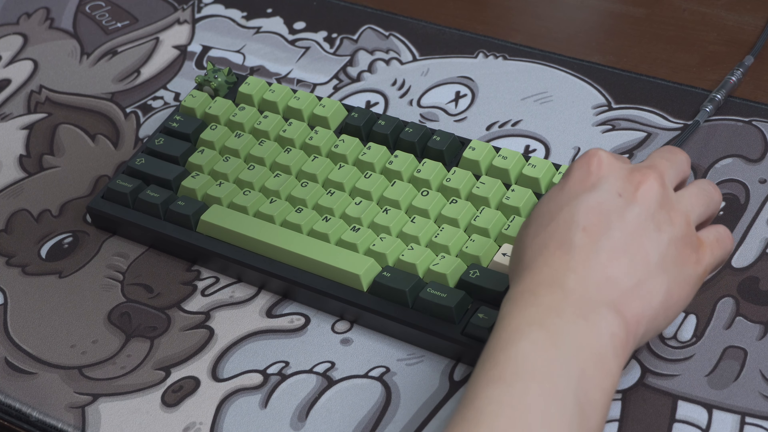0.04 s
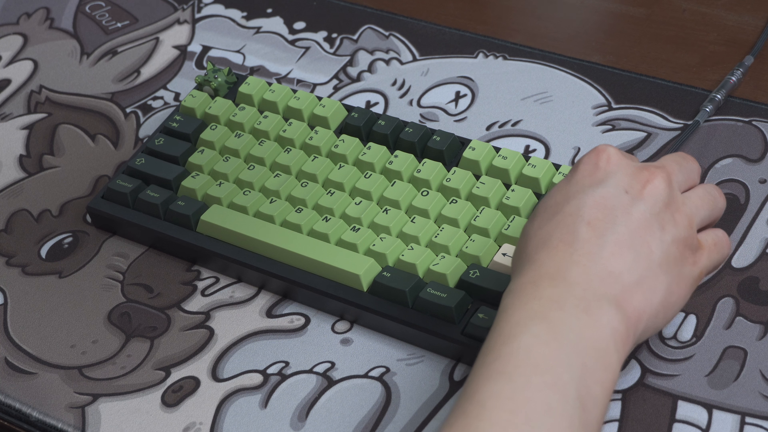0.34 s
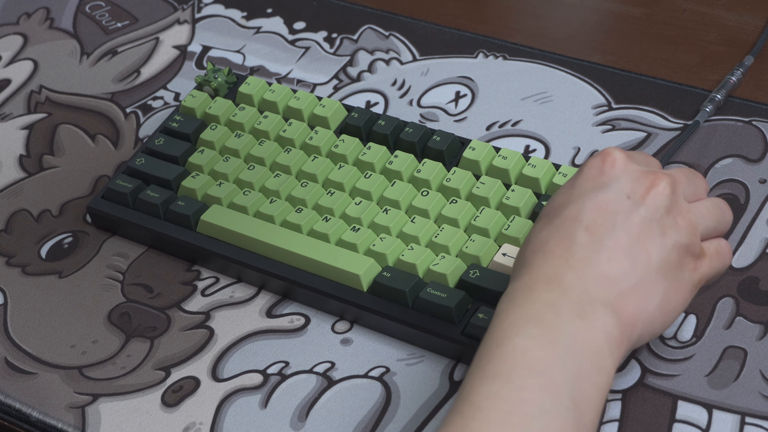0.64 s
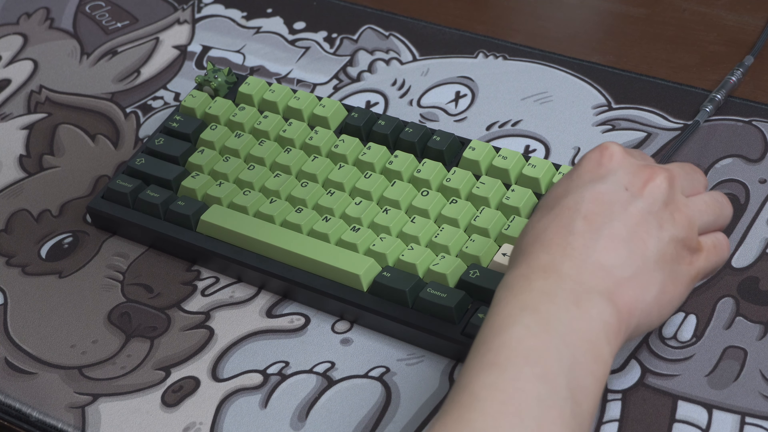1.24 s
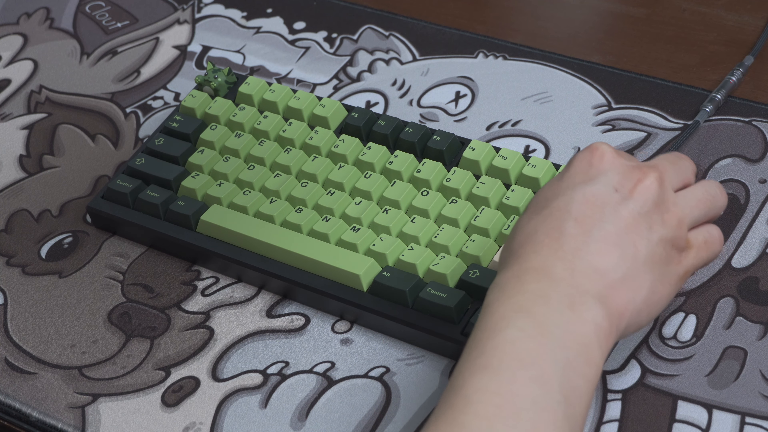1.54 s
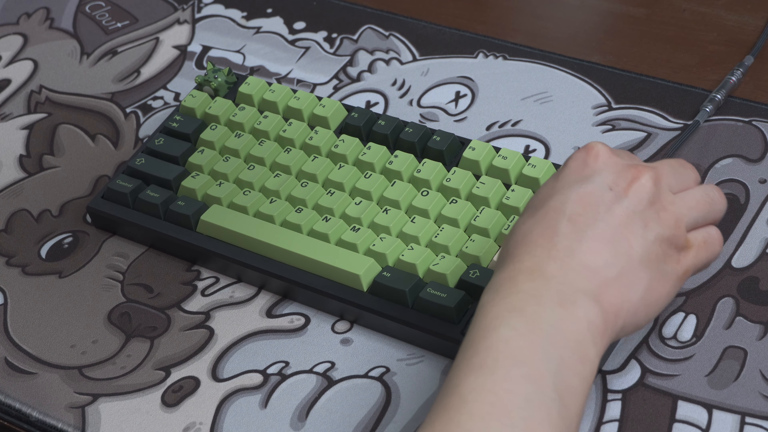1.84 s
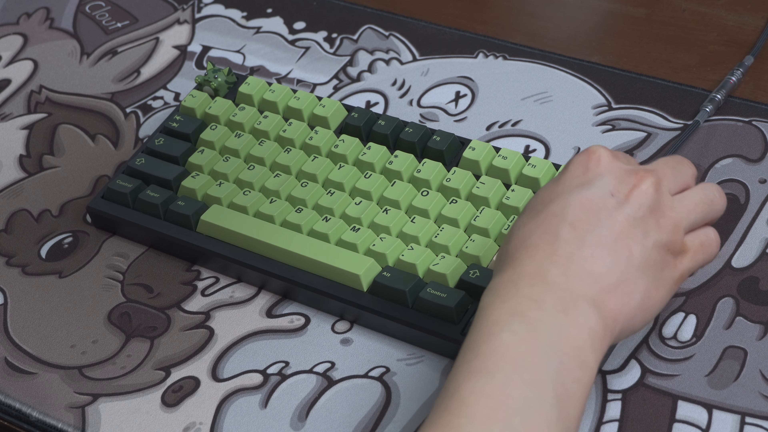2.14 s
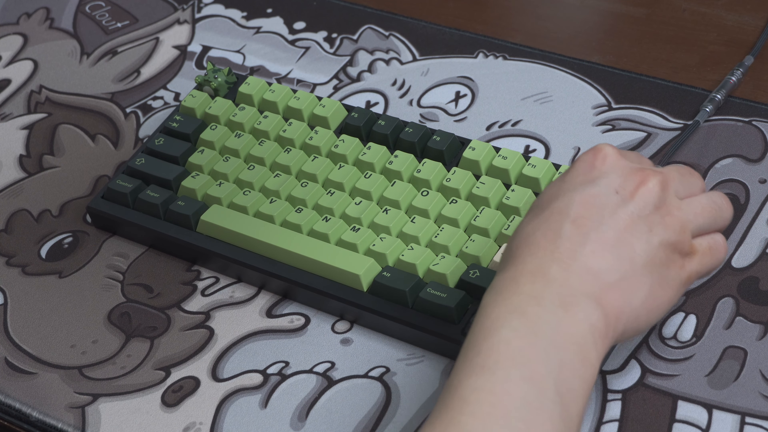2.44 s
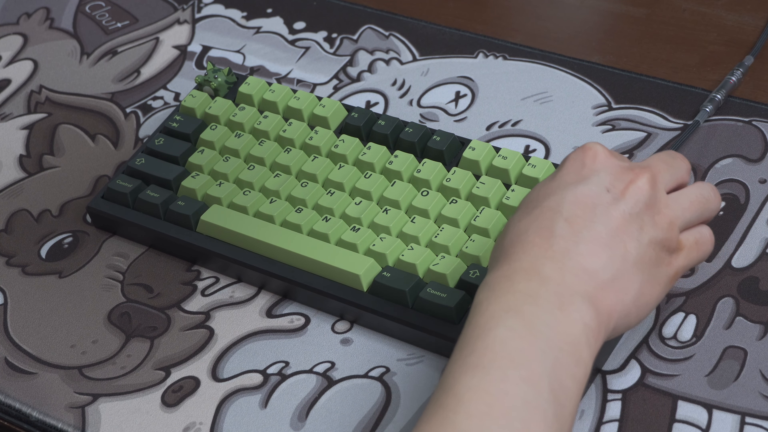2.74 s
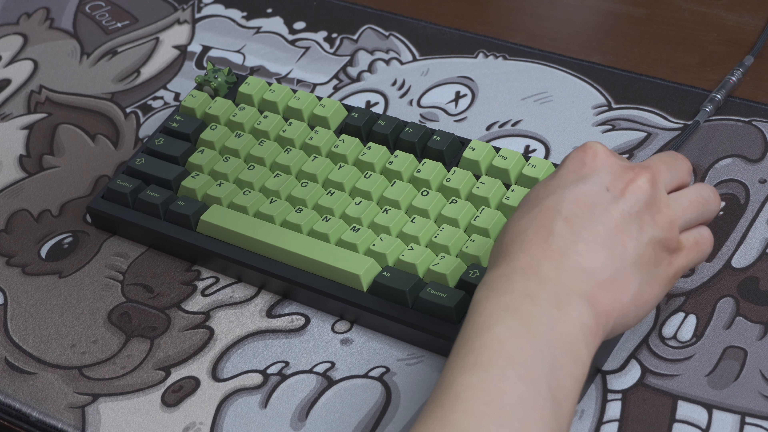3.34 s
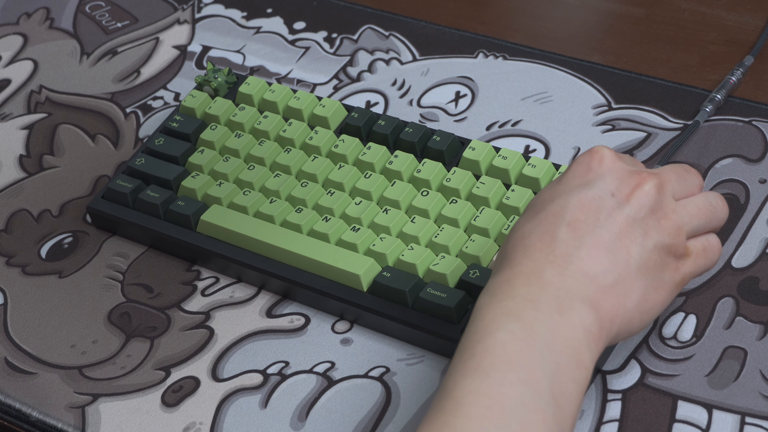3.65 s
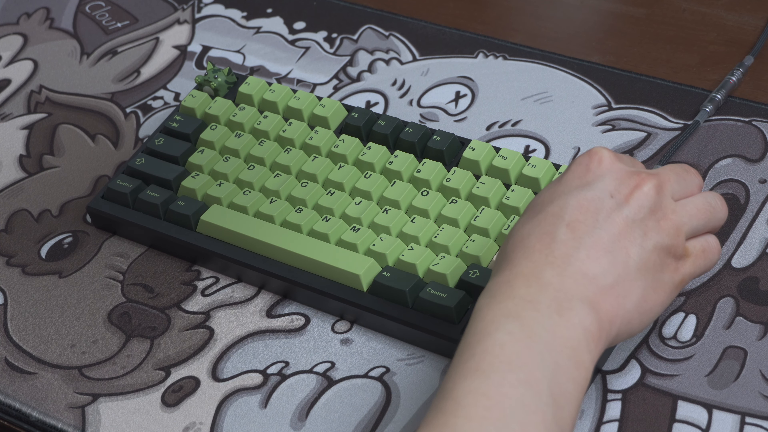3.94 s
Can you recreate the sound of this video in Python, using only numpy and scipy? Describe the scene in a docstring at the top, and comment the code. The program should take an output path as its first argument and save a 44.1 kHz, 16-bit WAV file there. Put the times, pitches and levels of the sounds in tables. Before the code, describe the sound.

A keyboard's rotary knob clicks through its notches, close by. A slow, soft run starts at about 0.3 seconds, then roughly ten quicker twists follow, each a short ratchet-like burst of small, slightly ringing clicks, ending near 3.4 seconds. Fingers faintly rub the case between 1 and 2 seconds, with a few soft, low bumps on the desk mat. Quiet room hum continues underneath and swells slightly at the end.

```python
"""Detented knob on a mechanical keyboard, twisted back and forth in eleven quick strokes.
Per detent: the spring ticks, the knob rings with a short falling chirp and seats, the case thuds.
A nearby surface reflects each click; a short echo follows. The hand bumps the desk mat and
rubs the case. Background: quiet room noise, hum, subsonic drift, faint whines."""
import sys
import numpy as np
from scipy import signal
from scipy.fft import rfft, irfft, next_fast_len
from scipy.io import wavfile

SR = 44100
rng = np.random.default_rng(int(sys.argv[2]) if len(sys.argv) > 2 else 0)


def int16_out(signal):
    """Quantize to a 16-bit WAV file."""
    q = np.round(np.clip(np.atleast_2d(signal).T, -1, 1) * 32767)
    wavfile.write(sys.argv[1], SR, q.astype(np.int16))


N = 176400
TIME_S = np.arange(N) / SR
CLICK_SAMPLES = 4096
CLICK_S, CLICK_HZ = np.arange(CLICK_SAMPLES) / SR, np.fft.rfftfreq(CLICK_SAMPLES, 1 / SR)

# detents: (time [s], knob ring [relative dB], spring tick [relative dB], case thud [relative dB])
DETENT_SNAPS = [(0.2877, -65.5, -99, -87), (0.3281, -64.5, -94.0, -82), (0.3628, -64, -85, -80),
                (0.393, -68, -93.0, -85), (0.422, -71.5, -94.0, -84), (0.4663, -89, -100, -91),
                (0.668, -80, -100, -84), (0.7055, -75.5, -99, -82), (0.7393, -72, -97, -95),
                (0.765, -64, -86, -90), (0.7869, -63, -88, -73.0), (0.8062, -57.0, -79, -77),
                (0.823, -61.5, -85, -93), (0.8376, -54.5, -75.5, -81), (0.8513, -55.5, -74, -71),
                (0.866, -57, -80, -74), (0.8793, -66, -98, -79), (1.0464, -59.5, -77, -64),
                (1.0657, -56.5, -73, -67), (1.078, -54, -68, -71.5), (1.0904, -70, -74, -79),
                (1.1025, -59, -80, -89), (1.1157, -62, -73, -80), (1.131, -63, -77, -90),
                (1.1447, -64, -84, -82), (1.159, -74, -73, -83), (1.1738, -68.5, -93, -74),
                (1.2, -68.5, -77.5, -95), (1.2272, -73, -103, -69), (1.337, -71, -81, -79.5),
                (1.3623, -71, -84, -71.5), (1.3843, -66.5, -78, -75), (1.404, -69, -70.5, -87),
                (1.4192, -69.5, -76, -75), (1.4347, -63.5, -70, -77), (1.4501, -55.5, -73, -63.5),
                (1.467, -60, -84, -64), (1.4944, -66.5, -87, -66), (1.5166, -63, -97, -60.0),
                (1.5397, -62, -83, -67), (1.5669, -68.5, -97, -66), (1.63, -107, -78, -76),
                (1.6661, -55, -75, -72), (1.6835, -56.5, -73.5, -91), (1.6988, -55, -72, -82),
                (1.7136, -58.5, -79, -81), (1.7286, -62, -75, -70), (1.7428, -59, -83, -73.5),
                (1.757, -62, -73, -77), (1.7709, -64.0, -79, -82), (1.7867, -64.5, -72.5, -71),
                (1.8026, -74, -75, -88), (1.864, -105, -82, -85), (1.9861, -64.5, -77, -64.5),
                (2.0007, -54.5, -73, -77), (2.0124, -53, -71, -63), (2.0227, -54, -71, -71),
                (2.0347, -53, -74, -63), (2.047, -51, -70, -68), (2.0603, -56, -74, -63.5),
                (2.0742, -53.5, -72, -68.5), (2.0883, -54.5, -83, -64.0), (2.1072, -63, -89, -63),
                (2.1384, -75, -91, -69), (2.2326, -56.5, -80, -79), (2.255, -57, -77, -76),
                (2.2672, -58, -69, -85), (2.2784, -56, -74, -80), (2.2881, -60.5, -71, -89),
                (2.3, -59, -72, -83), (2.3111, -61, -75.0, -78), (2.3231, -59.5, -75, -77),
                (2.333, -62, -71, -70), (2.3451, -65, -77, -78), (2.3603, -70, -73, -69),
                (2.5432, -73, -70, -74), (2.5556, -69, -69.5, -82), (2.565, -63, -66, -72),
                (2.5753, -62, -66, -71), (2.5848, -54.5, -71, -67), (2.5959, -53.5, -81, -63),
                (2.61, -58, -75, -63.5), (2.6299, -62, -81, -64.5), (2.6543, -62.5, -77, -64.5),
                (2.683, -66.5, -91, -65.5), (2.7807, -60, -73, -78), (2.793, -59, -71.5, -69.5),
                (2.8048, -57, -78, -88), (2.8141, -57.5, -67, -74.0), (2.825, -57, -71, -77),
                (2.8363, -63, -76, -87), (2.8507, -60.5, -77, -66), (2.863, -68, -74, -75),
                (2.8794, -65, -80, -77), (2.8981, -66.5, -72, -70), (3.0572, -98, -81, -73.5),
                (3.075, -62, -74, -67.5), (3.0893, -57.5, -71, -69.5), (3.101, -54.5, -72, -62.5),
                (3.1127, -54.5, -71, -67), (3.1255, -56.0, -73, -66), (3.1404, -58.5, -80, -60),
                (3.1589, -66.5, -91, -66), (3.1968, -70.5, -100, -69), (3.3022, -73, -86, -87),
                (3.3288, -60, -72, -67.5), (3.3409, -58.5, -79.5, -69), (3.3548, -62.5, -72.5, -69),
                (3.369, -64.5, -79, -82), (3.403, -72, -87, -69)]
# grip per twist: (start [s], ring treble gain [dB], ring lows and seat gain [dB])
GRIPS = [(.25, -10, -3.5), (.62, -2, -2), (1.02, 4.5, 3.5), (1.3, -2.5, 0.5), (1.6, -2.5, -9),
         (1.95, -7, -1.5), (2.2, -2, -2), (2.5, -5.5, -1.5), (2.75, -2, -0.5), (3.02, -5.5, -1.5),
         (3.27, -3, -2.5)]
# knob ring spectrum: (frequency [Hz], gain [dB])
KNOB_SPECTRUM = [(500, -45), (1120, -20.5), (1340, -3), (1550, -18.5), (1700, -3), (1850, 0), (2050, -7.5),
                 (2350, -7), (2560, -23), (2920, -11), (3200, -24), (3750, -18), (4300, -34.5), (8000, -72)]
# spring resonances: (frequency [Hz], width [Hz], gain [dB])
SPRING_MODES = [(4310, 340, 1), (5570, 580, 0), (7940, 610, 1), (10680, 910, -4), (12080, 770, -0.5),
                (13700, 3600, -9.5)]
# case resonances: (frequency [Hz], width [Hz], gain [dB])
CASE_MODES = [(496, 77, 3), (754, 80, -4), (949, 116, -5)]
# hand on desk mat: (centre [s], frequency [Hz], half-width [s], level [dB])
MAT_BUMPS = [(0.538, 84, 0.022, -52), (1.198, 32.5, 0.065, -50.5), (2.499, 32, 0.087, -50.5),
             (2.896, 32.8, 0.097, -49)]
# fingers on case: (centre [s], half-width [s], level [dB])
FINGER_RUBS = [(1.07, 0.029, -66), (1.483, 0.063, -70.5), (1.794, 0.32, -65)]
# rubbing spectrum: (frequency [Hz], gain [dB])
RUB_SPECTRUM = [(70, -6), (140, 5.5), (330, -2), (700, -23), (9000, -49)]
# room noise spectrum: (frequency [Hz], gain [dB])
ROOM_SPECTRUM = [(20, 0), (36, 3), (52, -14.5), (75, -7), (150, -11), (280, -11), (380, -23), (1000, -30.5),
                 (2000, -38), (4000, -50), (7000, -52), (15000, -61)]
# swell of rumble and hum, applied about its mean: (time [s], level [dB])
RUMBLE_SWELL = [(0.1, -65.5), (3.65, -65), (3.98, -55.5)]
# hum tones: (frequency [Hz], level before swell [dB])
HUM_TONES = [(114, -73.5), (252, -77)]
# subsonic pressure drift: (time [s], level [dB])
DRIFT_LEVEL = [(0.6, -36), (4, -50)]
# background whines: (start [s], length [s], frequency [Hz], level [dB])
WHINE_TONES = [(0.574, 0.21, 4100, -99), (3.3, 1, 2496, -93.5), (3.493, .4, 567.5, -78)]


def knob(slow_gap_s=0.02005, treble_db_per_db=0.17):
    """Each detent excites knob, spring and case. Harder snaps ring brighter."""
    out, snaps, grips = np.zeros(N), np.array(DETENT_SNAPS), np.array(GRIPS)
    spring, case = resonances(SPRING_MODES), resonances(CASE_MODES)
    for (start_s, ring_db, tick_db, thud_db), gap_s in zip(snaps, np.gradient(snaps[:, 0])):
        _, treble_db, lows_db = grips[grips[:, 0] <= start_s][-1]
        slowness = min(gap_s / slow_gap_s, 1)
        hardness_db = treble_db_per_db * (ring_db - snaps[:, 1].mean())
        click = amp(ring_db) * knob_ring(treble_db + hardness_db, lows_db, slowness)
        click += amp(tick_db - 1.5) * snap(spring, t60_s=0.0085, rattle_db=12, energy=180)
        click += amp(thud_db) * snap(case, t60_s=0.03, rattle_db=-1, energy=500)
        click += amp(lows_db) * seat(slowness, ring_db)
        add_with_reflections(out, start_s, click)
    return out


def knob_ring(treble_db, lows_db, slowness, base_lag_s=0.001097):
    """Ring with loose-part clatter. Lows lag, more in slow turns: a falling chirp."""
    treble, lows = 1 - below(CLICK_HZ, 2150), below(CLICK_HZ, 1550)
    body = minimum_phase(spectrum_db(KNOB_SPECTRUM, CLICK_HZ) + treble_db * treble + lows_db * lows)
    lag_s = base_lag_s * (1 + 1.085 * slowness ** 2) * below(CLICK_HZ, 1709)
    chirp = np.exp(-2j * np.pi * np.cumsum(lag_s) * CLICK_HZ[1])
    return snap(body * chirp, t60_s=0.024, rattle_db=-9, energy=280)


def snap(body, t60_s, rattle_db, energy):
    """Impulse plus decaying rattle through a body response."""
    x = irfft(body * (1 + amp(rattle_db) * rfft(noise_burst(t60_s))))
    return x * np.sqrt(energy) / np.linalg.norm(x)


def seat(slowness, ring_db, mean_hz=1438, t60_s=0.02, attack_s=0.00061, slow_delay_s=0.003336):
    """Blip as the knob settles into its notch; later and louder in slow turns."""
    delay_s = slow_delay_s * slowness * rng.uniform(0.913, 1.158)
    age_s = np.maximum(CLICK_S - delay_s, 0)
    tone = np.sin(2 * np.pi * mean_hz * rng.normal(1, 0.043) * age_s)
    envelope = amp(-60 * age_s / t60_s) * (1 - np.exp(-age_s / attack_s))
    return slowness * amp(-58 + 0.15 * (ring_db + 69)) * tone * envelope


def add_with_reflections(track, start_s, click, wall_s=0.00757, wall_db=-14, echo_s=0.004, echo_db=-14):
    """Mix in the direct click, one near-surface reflection and a diffuse echo."""
    echo = signal.fftconvolve(click, noise_burst(t60_s=0.21))
    for delay_s, x in (0, click), (wall_s, amp(wall_db) * click), (echo_s, amp(echo_db) * echo):
        part = track[round((start_s + delay_s) * SR):][:len(x)]
        part += x[:len(part)]


def hand():
    """Soft low pushes on the desk mat; finger friction on the case."""
    bumps = sum(amp(db) * bell(centre_s, width_s) * np.sin(2 * np.pi * hz * (TIME_S - centre_s))
                for centre_s, hz, width_s, db in MAT_BUMPS)
    friction = noise(lambda hz: amp(spectrum_db(RUB_SPECTRUM, hz)))
    return bumps + friction * sum(amp(db) * bell(centre_s, width_s) for centre_s, width_s, db in FINGER_RUBS)


def room(noise_db=-60.5, drift_hz=3.883):
    """Room noise and subsonic drift; rumble and wavering hum swell at the end."""
    air = amp(noise_db) * noise(lambda hz: amp(spectrum_db(ROOM_SPECTRUM, hz)) * (hz > 15))
    rumble = filtered(air, lambda hz: below(hz, 560) * hz ** 2 / (hz ** 2 + 125 ** 2))
    hum = sum(amp(db) * wavering_tone(hz, waver_hz=3, depth_rad=1.3) for hz, db in HUM_TONES)
    swell_db = curve(RUMBLE_SWELL)
    drift = amp(curve(DRIFT_LEVEL)) * noise(lambda hz: np.exp(-(hz - drift_hz) ** 2 / 2))
    return air - rumble + amp(swell_db - swell_db.mean()) * (rumble + hum) + drift


def whines():
    """Faint unsteady tones fading in and out."""
    out = np.zeros(N)
    for start_s, length_s, hz, db in WHINE_TONES:
        progress = np.clip((TIME_S - start_s) / length_s, 0, 1)
        fade = np.sqrt(np.abs(np.sin(np.pi * progress)))
        out += amp(db) * fade * wavering_tone(hz, waver_hz=20, depth_rad=1)
    return out


def wavering_tone(hz, waver_hz, depth_rad):
    """Sine with random phase wander, rms 1."""
    wander_rad = depth_rad * noise(lambda f: np.exp(-f / waver_hz))
    return unit_rms(np.sin(2 * np.pi * hz * TIME_S + wander_rad))


def resonances(modes):
    """Sum of band-pass responses, alternating polarity."""
    jf = 1j * CLICK_HZ
    return sum((-1) ** k * amp(db) * jf * width_hz / (hz ** 2 + jf ** 2 + jf * width_hz)
               for k, (hz, width_hz, db) in enumerate(modes))


def minimum_phase(gain_db):
    """Causal response with the given magnitude."""
    cepstrum = irfft(np.log(amp(gain_db)))
    cepstrum[1:CLICK_SAMPLES // 2] *= 2
    cepstrum[CLICK_SAMPLES // 2 + 1:] = 0
    return np.exp(rfft(cepstrum))


def noise_burst(t60_s):
    """Decaying noise, energy 1."""
    burst = rng.standard_normal(CLICK_SAMPLES) * amp(-60 * CLICK_S / t60_s)
    return burst / np.linalg.norm(burst)


def noise(response):
    """Shaped noise, rms 1."""
    return unit_rms(filtered(rng.standard_normal(N), response))


def filtered(x, response):
    """FFT filter; response maps Hz to gain."""
    size = next_fast_len(N + SR // 2)
    return irfft(rfft(x, size) * response(np.fft.rfftfreq(size, 1 / SR)), size)[:N]


def below(hz, corner_hz):
    """Soft low-pass step."""
    return 1 / (1 + (hz / corner_hz) ** 10)


def spectrum_db(points, hz):
    """Interpolate on a log frequency axis."""
    points_hz, points_db = np.transpose(points)
    return np.interp(np.log(hz + 1), np.log(points_hz + 1), points_db)


def curve(points):
    """Interpolate in time, per sample."""
    return np.interp(TIME_S, *np.transpose(points))


def bell(centre_s, half_width_s):
    """Gaussian envelope."""
    return np.exp(-((TIME_S - centre_s) / half_width_s) ** 2)


def unit_rms(x):
    """Scale to rms 1."""
    return x / np.sqrt(np.mean(x ** 2) + 1e-20)


def amp(db):
    """dB to gain."""
    return 10 ** (np.asarray(db) / 20)


def scene():
    """Mono mix."""
    return (knob() + hand() + room() + whines())[None]


def record(dry):
    """Brick-wall low-pass."""
    return filtered(dry[0], lambda hz: hz < 15830)[None]


dry = scene()
out = record(dry)
int16_out(out)
```